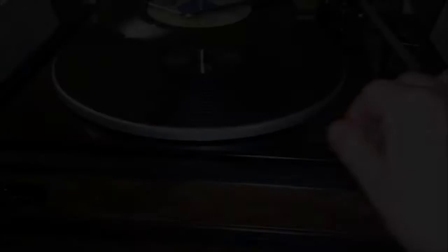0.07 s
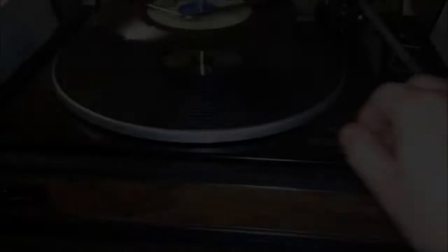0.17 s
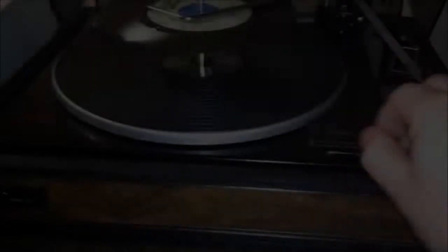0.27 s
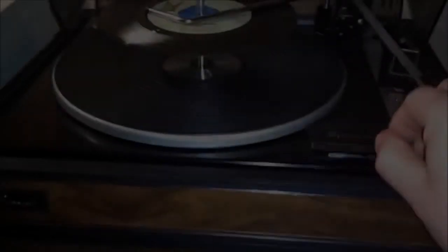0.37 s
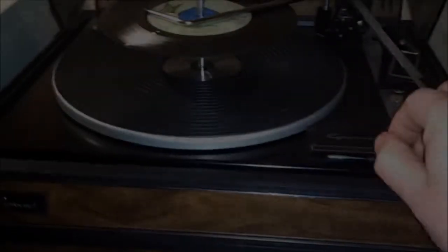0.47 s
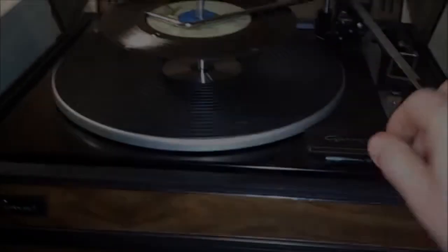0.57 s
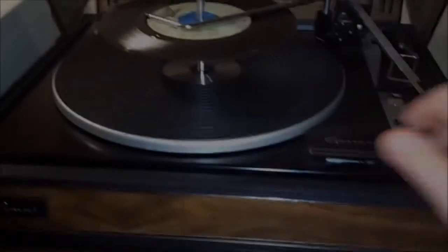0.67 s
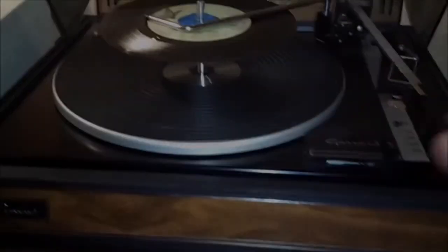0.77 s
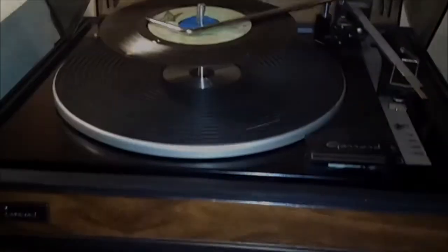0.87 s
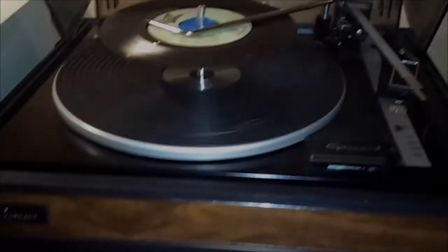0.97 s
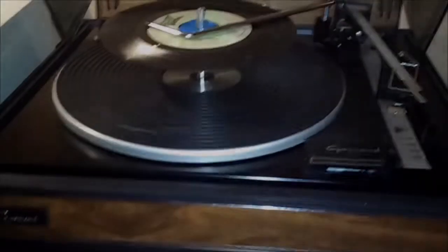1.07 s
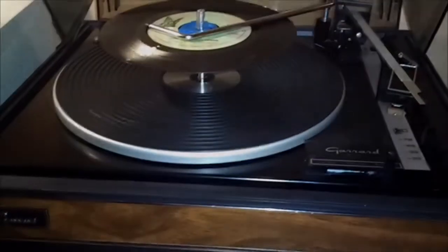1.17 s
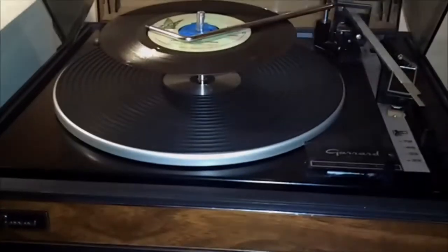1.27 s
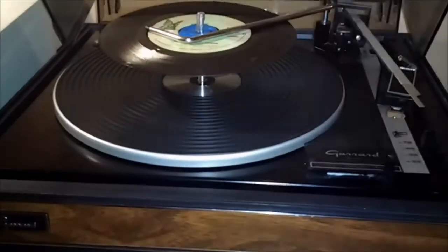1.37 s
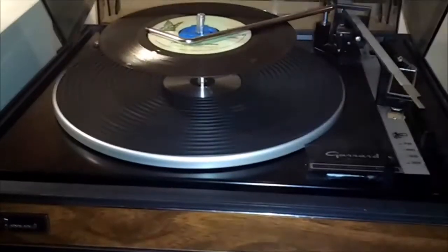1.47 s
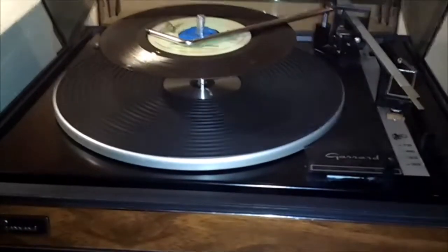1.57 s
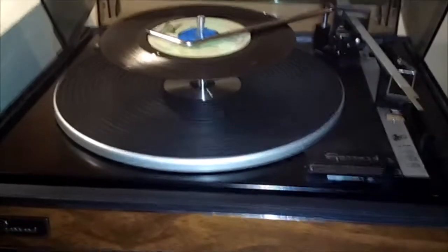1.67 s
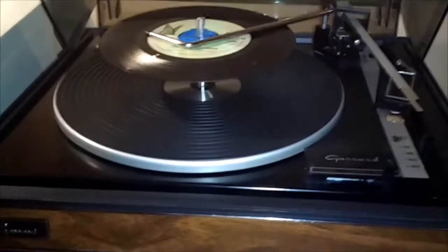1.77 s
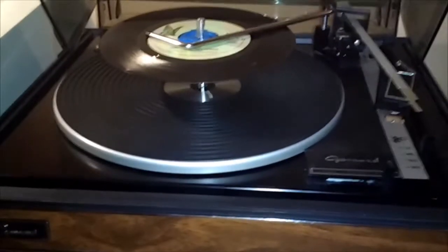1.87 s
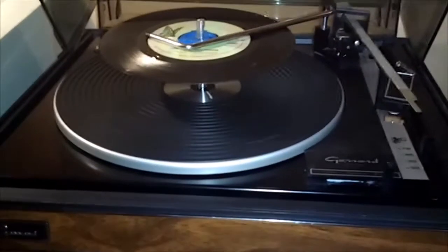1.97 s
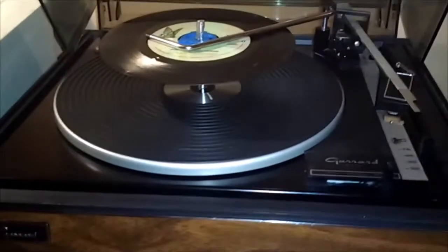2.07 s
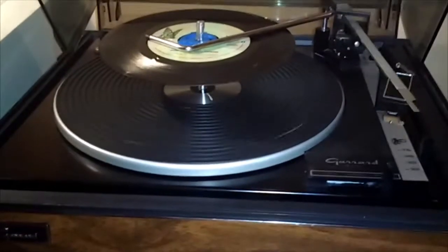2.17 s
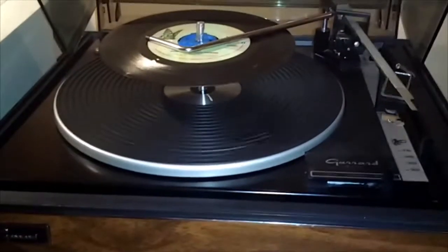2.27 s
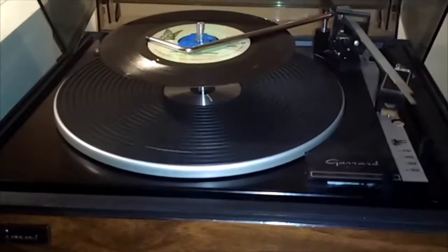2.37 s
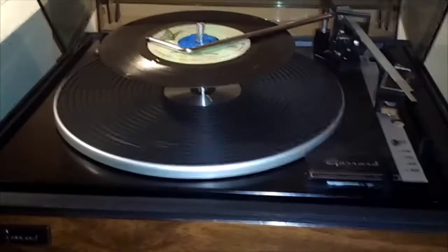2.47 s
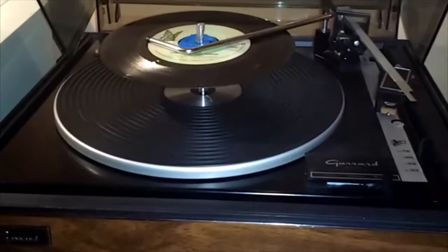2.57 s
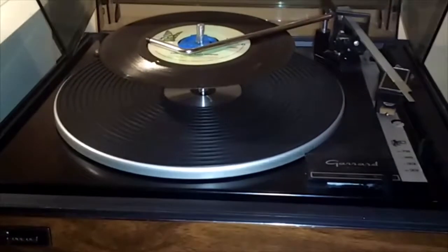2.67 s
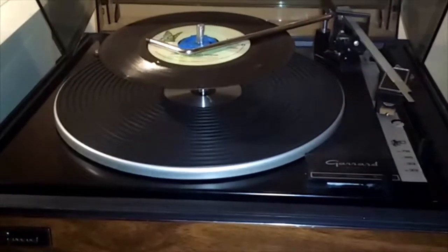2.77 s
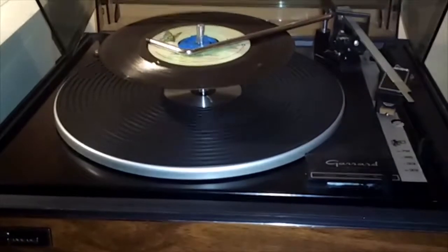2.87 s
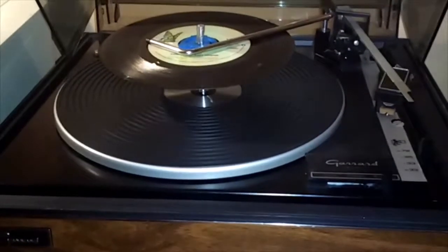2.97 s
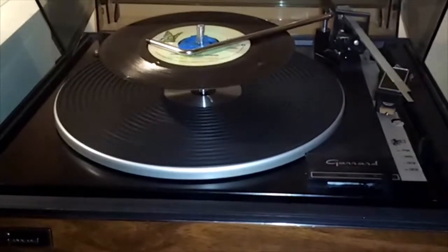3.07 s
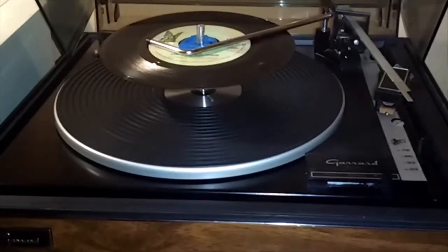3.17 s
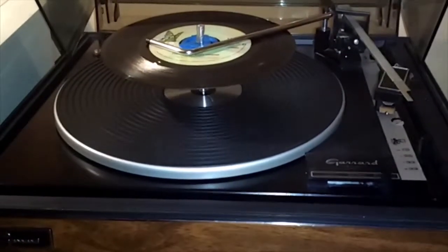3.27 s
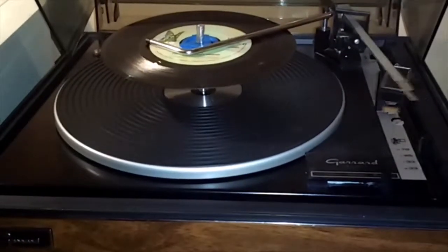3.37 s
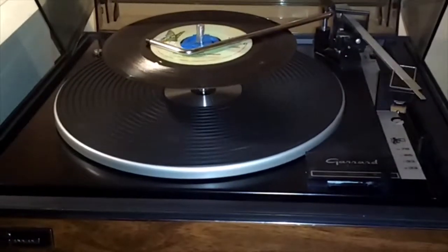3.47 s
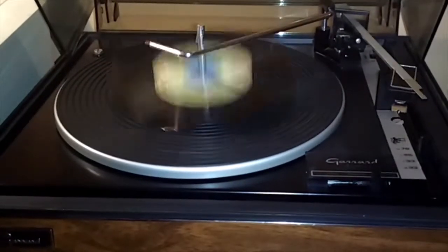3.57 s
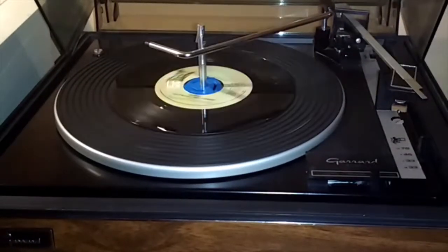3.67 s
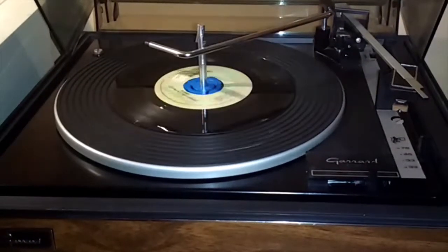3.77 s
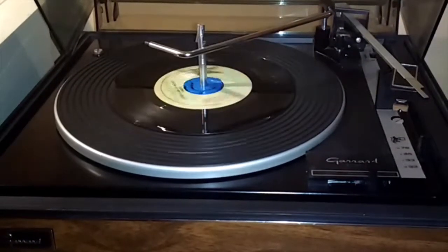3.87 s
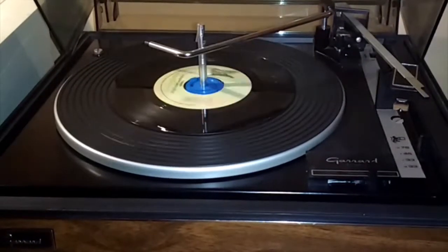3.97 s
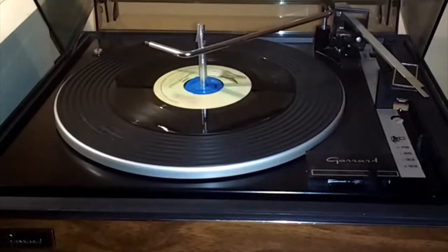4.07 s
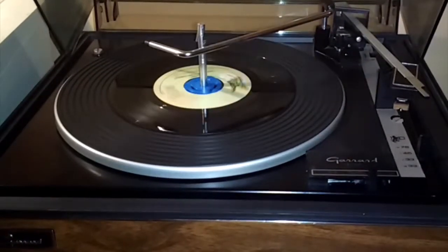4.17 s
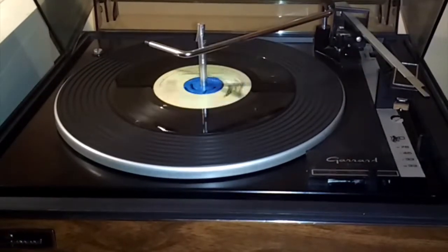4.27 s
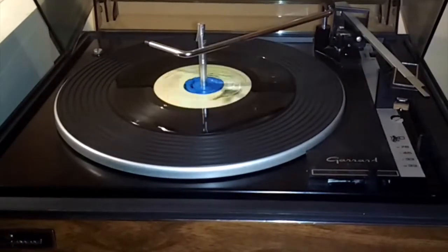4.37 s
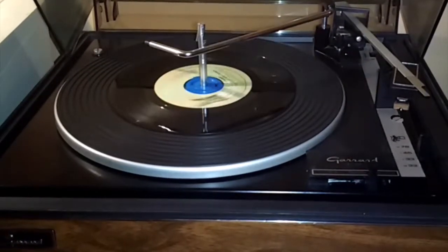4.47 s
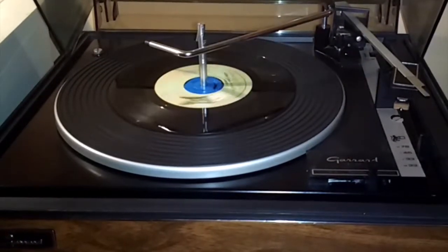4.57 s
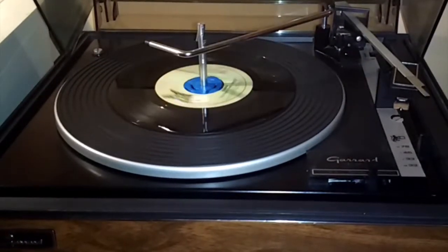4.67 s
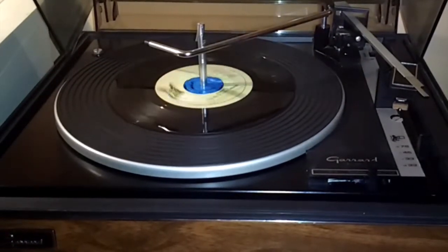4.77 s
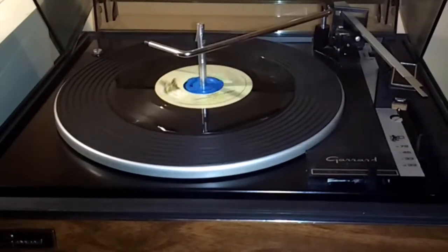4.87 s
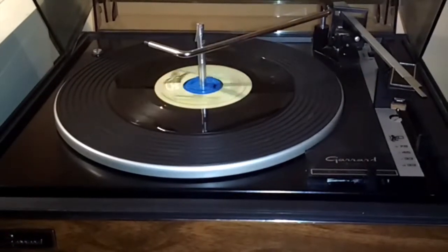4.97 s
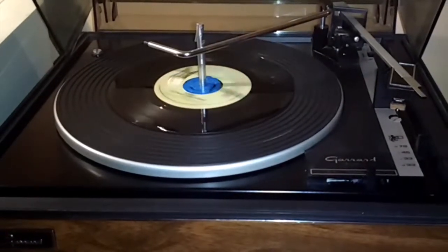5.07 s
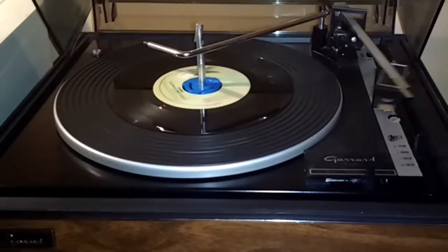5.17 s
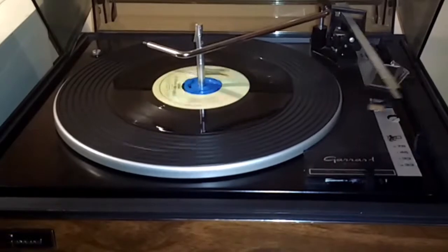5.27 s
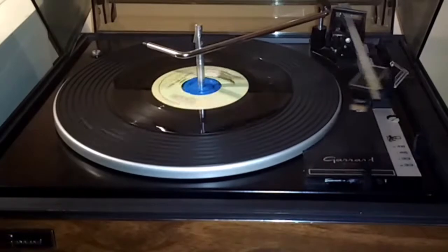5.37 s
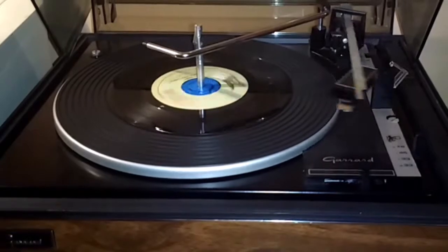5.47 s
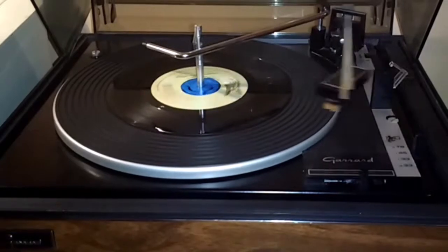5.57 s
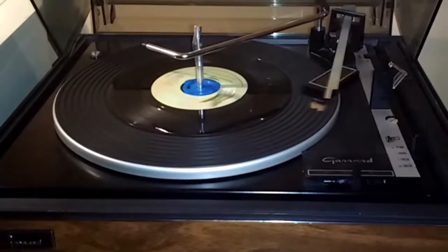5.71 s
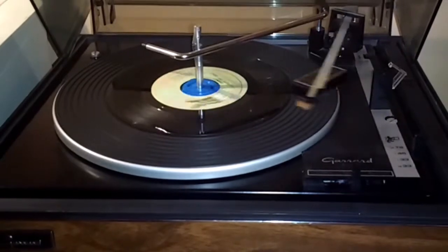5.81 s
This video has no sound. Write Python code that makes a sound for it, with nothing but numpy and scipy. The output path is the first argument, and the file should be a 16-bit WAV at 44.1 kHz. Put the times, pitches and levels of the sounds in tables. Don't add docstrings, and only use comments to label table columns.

```python
import sys
import numpy as np
from scipy import signal
from scipy.fft import rfft, irfft, next_fast_len
from scipy.io import wavfile

SR = 44100
rng = np.random.default_rng(int(sys.argv[2]) if len(sys.argv) > 2 else 0)


def bounce(signal):
    frames = np.transpose(np.atleast_2d(signal))
    limited = np.clip(frames, -1, 1)
    pcm = np.round(limited * 32767).astype(np.int16)
    wavfile.write(sys.argv[1], SR, pcm)


def voltage_ratio(level):
    return 10 ** (np.asarray(level, float) / 20)


N = 257544


def rms_one(x):
    return x / np.sqrt(np.mean(x ** 2) + 1e-20)


def at_hz(rows, hz, column=1):
    rows = np.array(rows)
    return np.interp(np.log(np.maximum(hz, 1)), np.log(rows[:, 0]), rows[:, column])


def filtered(x, design):
    return signal.sosfilt(design, x)


def drift(rate_hz):
    pole = np.exp(-80 * np.pi * rate_hz / SR)
    noise = rng.standard_normal(N // 40 + 2002)
    slow = signal.lfilter([1], [1, -2 * pole, pole * pole], noise)[2000:]
    return np.interp(np.arange(N) / 40, np.arange(len(slow)), rms_one(slow))


def coloured(spectrum):
    hz = np.fft.rfftfreq(N, 1 / SR)
    return rms_one(irfft(rfft(rng.standard_normal(N)) * voltage_ratio(at_hz(spectrum, hz)), N))


def ring(clicks, hz, t60):
    radius = voltage_ratio(-60 / (t60 * SR))
    w = 2 * np.pi * hz / SR
    return signal.lfilter([0, np.sin(w)], [1, -2 * radius * np.cos(w), radius ** 2], clicks + 1e-18)


def rattle(t60, rise_s, per_s):
    size = 8192
    t = np.arange(size) / SR
    heights = voltage_ratio(4.03 * np.minimum(rng.exponential(1, size), 4)) * rng.choice([-1, 1], size)
    touch = rng.random(size) < per_s / SR
    touch[90], heights[90] = True, voltage_ratio(11.5)
    envelope = (1 - np.exp(-t / rise_s)) ** 2 * voltage_ratio(-60 * t / t60)
    return heights * touch * envelope + 1e-12


def add(track, sound, s, db):
    at = round((s - .002) * SR)
    track[at:at + len(sound)] += (voltage_ratio(db) * sound / np.abs(sound).max())[:N - at]


# (time [s], level [dB])
MOTOR_LOAD = [(0.0, -80.5), (0.14, -65.5), (0.32, -61), (0.47, -65), (0.68, -64), (1.27, -57.5),
              (1.79, -60), (2.7, -58), (3.25, -63.5), (4.39, -58.5), (4.93, -58), (5.84, -57)]
# (peak time [s], rise [s], fall [s], rumble gain [dB], hiss gain [dB])
SLIDES = [
    (.19, 0.076, .1, 7, -2),
    (.31, 0.13, 0.24, 2, 14),
    (1.71, 0.21, 0.72, 3.5, 3.5),
    (3.63, .15, 0.11, 7.5, 5.5),
]


def running_levels():
    t = np.arange(N) / SR
    rumble_db = np.interp(t, *np.transpose(MOTOR_LOAD))
    hiss_db = -66 + 0.56 * (rumble_db + 58.5)
    for s, rise_s, fall_s, rumble_gain_db, hiss_gain_db in SLIDES:
        swell = np.interp(t, [s - rise_s, s, s + fall_s], [0, 1, 0])
        rumble_db = rumble_db + rumble_gain_db * swell
        hiss_db = hiss_db + hiss_gain_db * swell
    return rumble_db, hiss_db


# (frequency [Hz], density [dB per Hz])
RUMBLE_SPECTRUM = [(12, -54), (20, -17), (42, -12), (53, -17), (81, -5), (117, -6.5), (156, -5),
                   (676, -15.5), (985, -18.5), (1310, -23), (1380, -19), (1800, -24), (2340, -23),
                   (3960, -120)]
# (frequency [Hz], bandwidth [Hz], level [dB])
PANEL_HUMS = [(162.3, 41, -70.5), (190.8, 5.2, -66), (229, 2.7, -66.5), (369.7, 42, -72), (704, 60, -74.5)]


def rumble():
    sound = coloured(RUMBLE_SPECTRUM) * voltage_ratio(3 + .4 * drift(3))
    for hz, width_hz, db in PANEL_HUMS:
        sound += voltage_ratio(db + 59) * rms_one(ring(rng.standard_normal(N), hz, 12.0 / width_hz))
    return sound


# (frequency [Hz], density [dB per Hz])
HISS_SPECTRUM = [(900, -10.5), (1500, -6), (2200, -6), (3000, -5), (4500, -6.5), (6000, -10), (8000, -12),
                 (11000, -15), (14000, -16), (15400, -17.5), (15650, -22), (20000, -58)]


def hiss():
    return coloured(HISS_SPECTRUM) * voltage_ratio(3 + .7 * drift(10))


def running():
    rumble_db, hiss_db = running_levels()
    return rumble() * voltage_ratio(rumble_db) + hiss() * voltage_ratio(hiss_db)


def three_mode_hits(rows, t60):
    out = np.zeros(N)
    for s, db, hz in rows:
        contacts = ring(rattle(0.56 * t60, rise_s=0.0006, per_s=6100), hz, 2.0 / hz)
        add(out, sum(ring(contacts, hz * k, .5 * t60) for k in (.96, 1.001, 1.045)), s, db)
    return out


# (time [s], peak level [dB], frequency [Hz])
CREAKS = [(0.205, -51, 6000), (.55, -52.5, 3780), (1.84, -55.5, 6510), (1.851, -54.5, 2476),
          (1.861, -47.5, 1300), (2.47, -64, 4960), (2.72, -48, 760), (2.83, -56, 7000), (2.88, -55.5, 5100),
          (3.005, -49.5, 4017), (3.086, -46.5, 2010), (3.25, -55, 3530), (4.71, -51, 2255),
          (4.8, -49.5, 3300)]


def creaks():
    return three_mode_hits(CREAKS, t60=0.15)


# (time [s], peak level [dB], frequency [Hz])
TICKS = [(.678, -52.5, 2230), (.68, -50.5, 760), (0.839, -42.5, 223), (1.011, -42, 1260),
         (1.572, -53, 5030), (1.588, -36.5, 4500), (3.618, -37, 2420), (5.769, -41, 383), (1.81, -52, 7000),
         (1.881, -48.5, 4680), (2.628, -53, 4120), (2.32, -50, 2220), (2.789, -48.5, 770),
         (3.38, -55, 2460), (3.469, -56.5, 6040), (4.47, -59, 5630), (4.64, -57, 6400), (5.14, -52.5, 7000),
         (5.285, -45, 6940), (5.457, -43.5, 6250), (5.552, -45, 6920)]


def ticks():
    return three_mode_hits(TICKS, t60=0.066)


# (time [s], peak level [dB])
ARM_KNOCKS = [
    (5.34, -46.5),
    (5.404, -47.5),
    (5.47, -43.5),
    (5.604, -49),
    (5.664, -37.5),
]


def arm_knocks():
    return three_mode_hits([(s, db, 874) for s, db in ARM_KNOCKS], t60=0.091)


# (time [s], peak level [dB], frequency [Hz])
THUMP = [
    (3.65, -35.5, 88),
    (3.648, -55, 188),
    (3.648, -42, 44),
]


def thump():
    return three_mode_hits(THUMP, t60=0.062)


def two_mode_hit(out, s, db, hz, t60):
    contacts = ring(rattle(.025, rise_s=0.00023, per_s=4000), hz, 2.7 / hz)
    add(out, ring(contacts, hz, t60) + .5 * ring(contacts, 0.95 * hz, .5 * t60), s, db)


# (time [s], peak level [dB], frequency [Hz])
SPRING = [
    (.261, -31, 815),
    (1.592, -33, 770),
]


def spring():
    out = np.zeros(N)
    for s, db, hz in SPRING:
        two_mode_hit(out, s, db, hz, t60=.33)
    return out


# (time [s], peak level [dB])
LID_BLOWS = [
    (0.261, -34),
    (.365, -38),
    (.453, -53.5),
    (1.519, -43),
    (1.588, -39.5),
    (3.557, -39),
    (3.649, -38.5),
    (5.679, -30.5),
]


def lid():
    out = np.zeros(N)
    for s, db in LID_BLOWS:
        two_mode_hit(out, s, db, hz=442.8, t60=0.25)
    return out


# (time [s], peak level [dB], frequency [Hz])
PLATES = [(.171, -45, 1115), (.265, -27.5, 2250), (.339, -30, 6600), (.365, -23.5, 2290), (.366, -26, 1770),
          (.455, -39, 1670), (1.52, -31.5, 838), (1.59, -34, 1167), (1.591, -30, 2987),
          (3.556, -29.5, 1117), (3.575, -33.5, 785), (3.626, -26, 827), (3.646, -24, 4180),
          (3.654, -24, 1170), (3.652, -36.5, 334), (3.655, -25, 1965), (4.12, -40, 885),
          (4.1173, -36.5, 2565), (5.082, -41, 788), (5.083, -36.5, 2350), (5.677, -18, 1970),
          (5.677, -16.5, 2720), (5.678, -24.5, 7860), (5.679, -32.5, 333), (5.68, -28, 1190),
          (5.68, -22, 880), (5.738, -28.5, 2235), (5.738, -40, 1204)]


def plates():
    out = np.zeros(N)
    for s, db, hz in PLATES:
        two_mode_hit(out, s, db, hz, t60=.075 * (hz / 1000) ** -.7)
    return out


def dense_ring(contacts, low_hz, high_hz, t60):
    answer = rng.standard_normal(4096) * voltage_ratio(-60 * np.arange(4096) / SR / t60)
    answer[0] = 3.74
    band = signal.butter(3, [low_hz, high_hz], "band", fs=SR, output="sos")
    return rms_one(filtered(signal.fftconvolve(contacts, answer)[:len(contacts)], band))


def modal_ring(contacts, modes, low_hz, high_hz):
    weights_db = rng.normal(0, 1.5, len(modes))
    band = signal.butter(1, [low_hz, high_hz], "band", fs=SR, output="sos")
    within = filtered(contacts, band)
    total = 0
    for (hz, db, t60), weight_db in zip(modes, weights_db):
        total = total + voltage_ratio(db + weight_db) * ring(within, hz, t60)
    return rms_one(total)


# (time [s], linkage level [dB], plinth level [dB], clink level [dB], rattle t60 [s])
CLACKS = [(0.0426, -38, -50, -60, 0.085), (0.17, -67, -37.5, -57.5, 0.043), (0.2156, -54, -44.5, -65, 0.31),
          (0.257, -34, -22, -32.5, 0.046), (0.2746, -22.5, -23.5, -29.5, 0.016),
          (0.311, -32, -34, -44, 0.04), (0.339, -32, -30, -27, 0.038), (0.3635, -13.5, -23.5, -22.5, 0.054),
          (0.4528, -38.5, -47.5, -68, 0.045), (1.01, -51, -48, -74, 0.023),
          (1.5176, -27.5, -33.5, -39.5, 0.045), (1.587, -23.5, -21, -42, 0.033),
          (3.5555, -25, -28.5, -39, 0.025), (3.5744, -23, -40, -57, 0.031),
          (3.5887, -31, -34.5, -66, 0.089), (3.6248, -22.5, -30, -33.5, 0.079),
          (3.6463, -17, -26, -23, 0.03), (3.6525, -8, -24, -26, 0.046), (3.681, -42, -52, -46, 0.092),
          (4.1223, -37.5, -46, -58, 0.014), (5.0803, -34, -28.5, -62, 0.049),
          (5.6775, -7, -19.5, -26, 0.019), (5.6874, -19, -21.5, -29.5, 0.076),
          (5.7367, -38, -35, -50, 0.031)]
# (frequency [Hz], level [dB], t60 [s])
LINKAGE = [(1870, -24, 0.04), (1965, -5, 0.12), (2290, 5, 0.12), (2350, -19, 0.033), (2510, 12, 0.024),
           (2640, -22, 0.033), (2840, -8, 0.017)]
# (frequency [Hz], level [dB], t60 [s])
PLINTH = [(775, -35, 0.2), (889, 10, 0.19), (930, 3, 0.089), (1020, -46, 0.017), (1213, 13.5, 0.068),
          (1340, -30, 0.02)]
# (low edge [Hz], high edge [Hz], t60 [s], level [dB])
DENSE = [
    (1330, 3800, 0.036, -3.5),
    (644, 1620, 0.064, -0.5),
    (3300, 7830, 0.066, -1),
    (7000, 13100, 0.029, 9),
]


def clacks():
    out = np.zeros(N)
    for s, linkage_db, plinth_db, clink_db, t60 in CLACKS:
        levels_db = linkage_db, plinth_db, clink_db, clink_db - 12
        contacts = rattle(np.clip(t60, .008, .3), rise_s=0.00097, per_s=5000)
        for modes, db, (low_hz, high_hz, decay_s, trim_db) in zip((LINKAGE, PLINTH, [], []), levels_db, DENSE):
            sound = dense_ring(contacts, low_hz, high_hz, decay_s)
            if modes:
                sound += .38 * modal_ring(contacts, modes, low_hz, high_hz)
            add(out, sound, s, db + trim_db)
    return out


def mechanism():
    blows = clacks() + plates() + spring() + lid()
    blows = filtered(blows, signal.butter(3, 260, "high", fs=SR, output="sos"))
    weak = filtered(blows, signal.butter(1, [500, 690], "band", fs=SR, output="sos"))
    blows = blows - 0.55 * weak + ticks() + creaks() + arm_knocks() + thump()
    return filtered(blows, signal.cheby2(10, 50, 16600, fs=SR, output="sos"))


def room(x):
    t = np.arange(SR // 2) / SR
    t60 = 0.21
    tail = rng.standard_normal(len(t)) * voltage_ratio(-60 * t / t60) * (t > .004)
    tail = filtered(tail, signal.butter(1, 5800, fs=SR, output="sos"))
    return signal.fftconvolve(x, voltage_ratio(-15) * tail / np.sqrt(np.sum(tail ** 2)))[:N]


# (frequency [Hz], phase lead [rad], likeness [0-1])
LOW_TURN = [(20.2, 3.23, .97), (99, 2.77, 0.96), (296, 1.73, 0.92), (464, 1.25, 0.87), (1300, 0.44, 1),
            (1508, 2.53, 0.8), (1680, 3.44, 0.57), (2120, 4.4, 0.7)]


def widen(x):
    size = next_fast_len(N + 4096)
    hz = np.fft.rfftfreq(size, 1 / SR)
    lead_s = 24.75 / 44100
    comb = np.pi + 2 * np.pi * hz * lead_s
    high = hz > LOW_TURN[-1][0]
    turn = np.where(high, comb, at_hz(LOW_TURN, hz))
    alike = np.where(high, 0.9 + 0.1 * np.cos(2 * comb), at_hz(LOW_TURN, hz, column=2))
    alike = np.clip(alike, 0, 1)
    frames = signal.stft(x, nperseg=512)[2]
    scrambled = frames * np.exp(2j * np.pi * rng.random(frames.shape))
    unlike = signal.istft(scrambled, nperseg=512)[1][:N]
    unlike *= np.std(x) / np.std(unlike)
    right = alike * np.exp(1j * turn) * rfft(x, size) + np.sqrt(1 - alike ** 2) * rfft(unlike, size)
    return np.array([x, irfft(right, size)[:N]])


# (frequency [Hz], gain [dB])
BLOW_BALANCE = [(200, -1), (380, 4), (700, 2), (1290, -2), (2400, 1), (4400, -0.7)]


def left_lean(blows):
    lean = voltage_ratio(at_hz(BLOW_BALANCE, np.fft.rfftfreq(N, 1 / SR))) - 1
    return irfft(rfft(blows) * lean, N)


def scene():
    blows = mechanism()
    blows = blows + room(blows)
    left, right = widen(blows + running())
    return np.array([left + left_lean(blows), right])


def top_cut(x):
    return signal.sosfilt(signal.butter(12, 16640, fs=SR, output="sos"), x)


def record(dry):
    start_s, end_s = .012, .044
    opening = np.clip((np.arange(N) / SR - start_s) / (end_s - start_s), 0, 1) ** 2
    return top_cut(dry * opening)


dry = scene()
out = record(dry)
bounce(out)
```